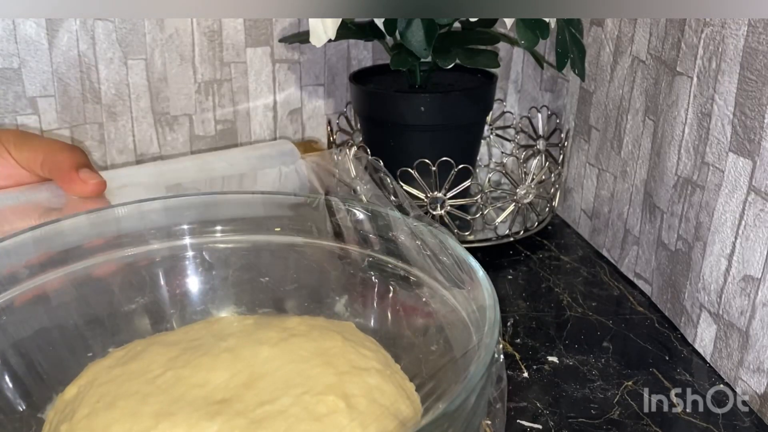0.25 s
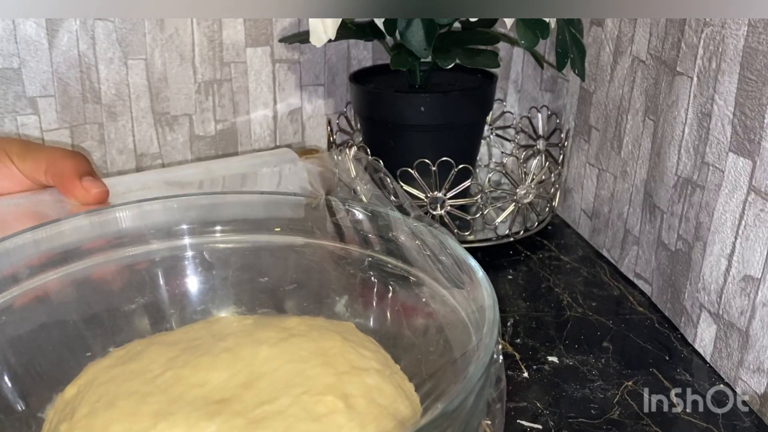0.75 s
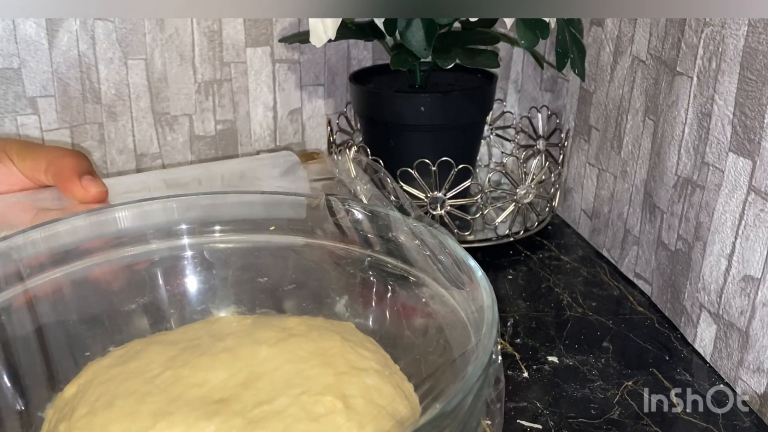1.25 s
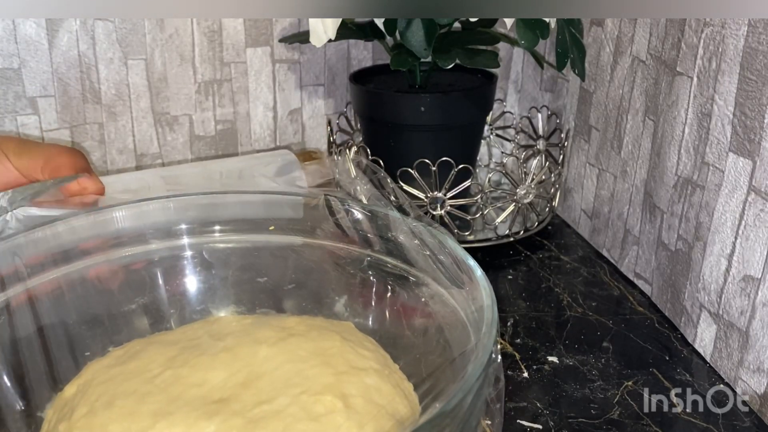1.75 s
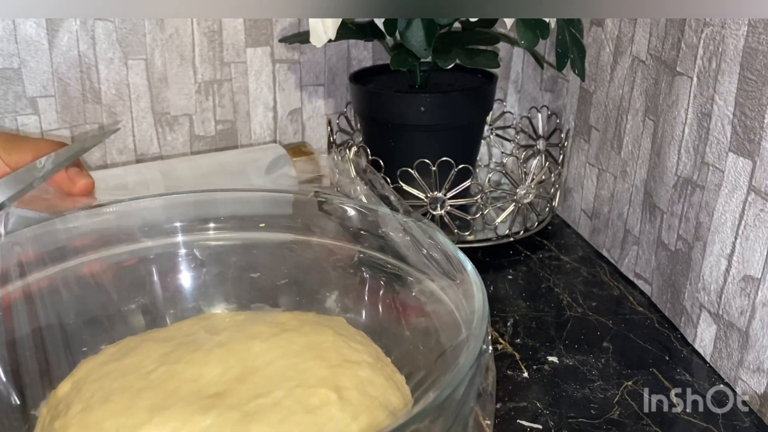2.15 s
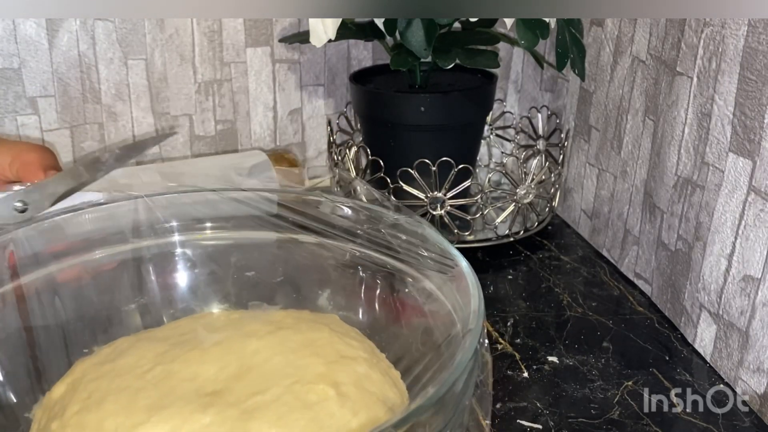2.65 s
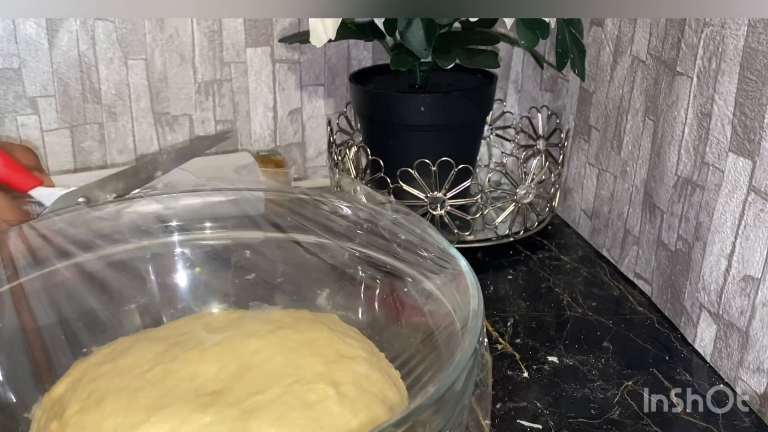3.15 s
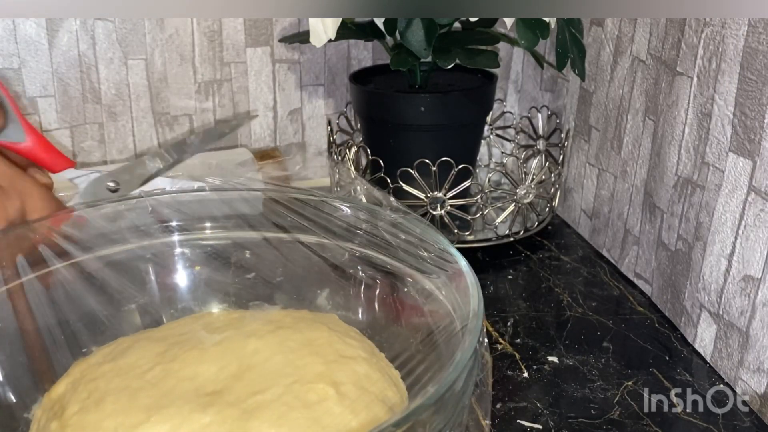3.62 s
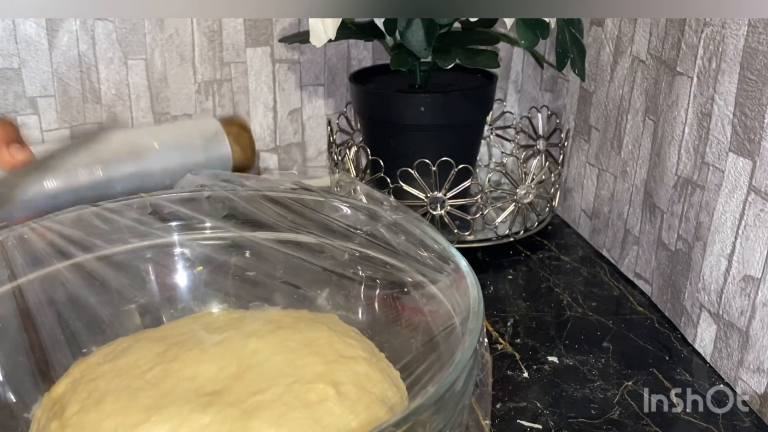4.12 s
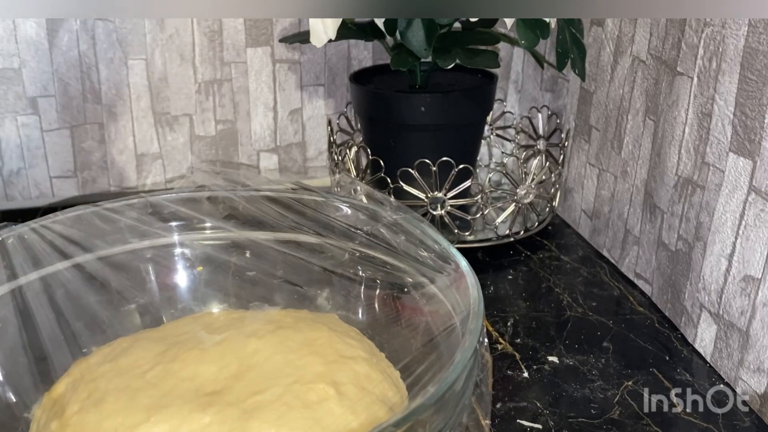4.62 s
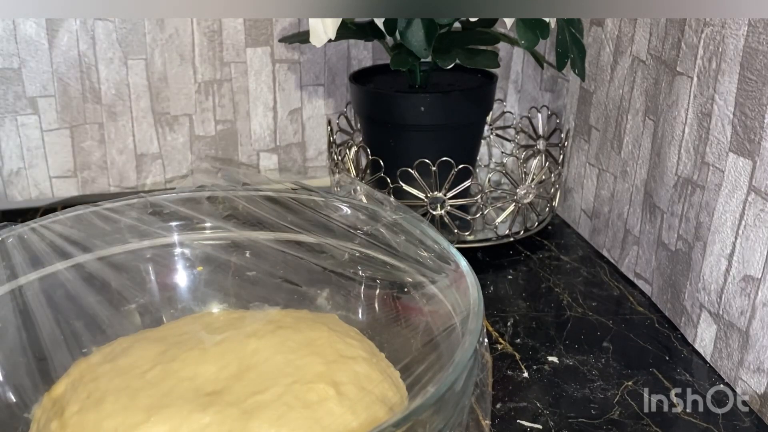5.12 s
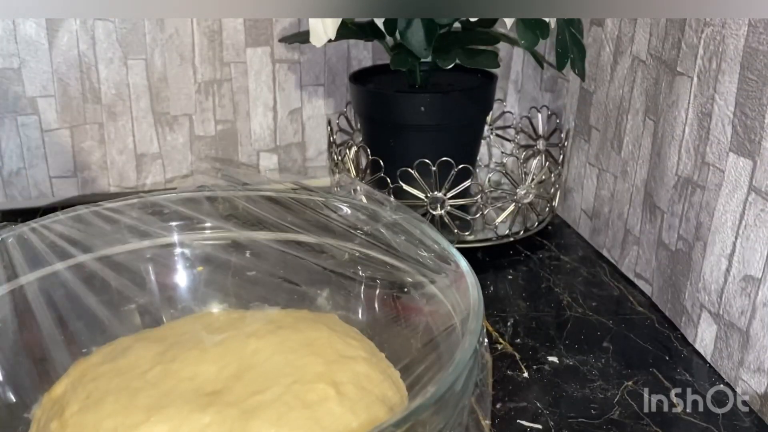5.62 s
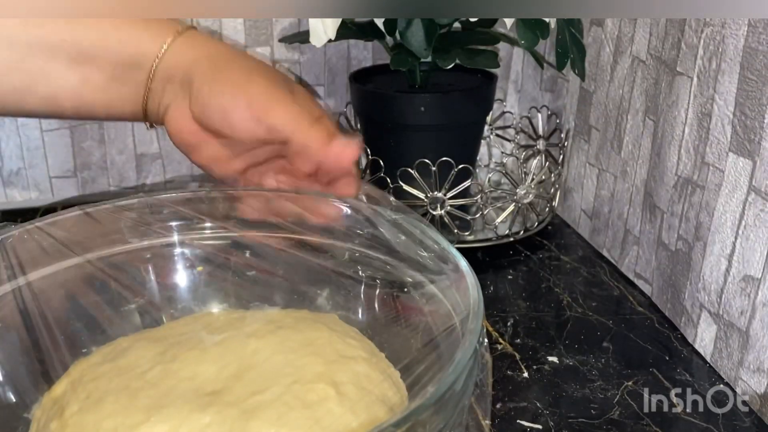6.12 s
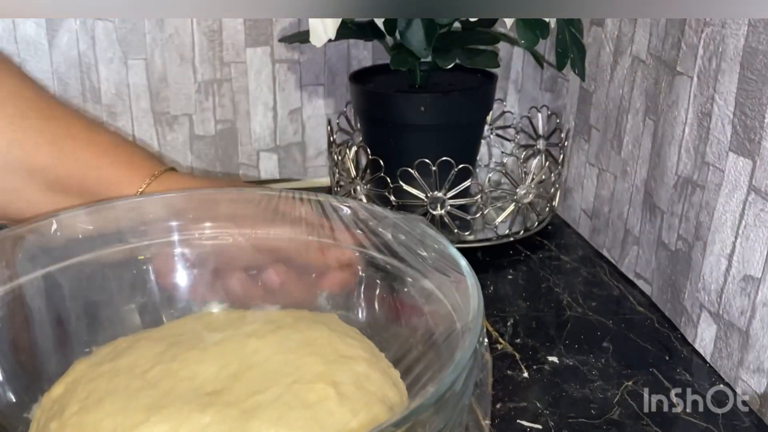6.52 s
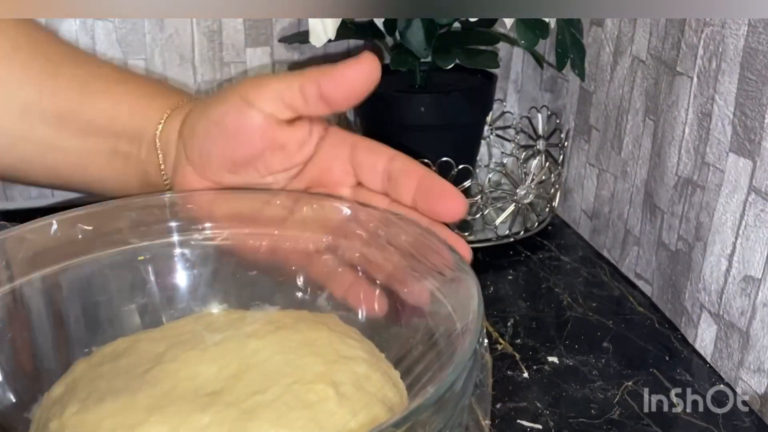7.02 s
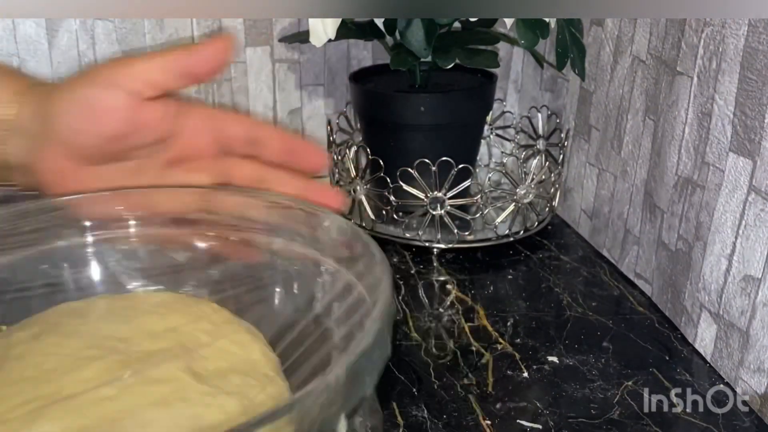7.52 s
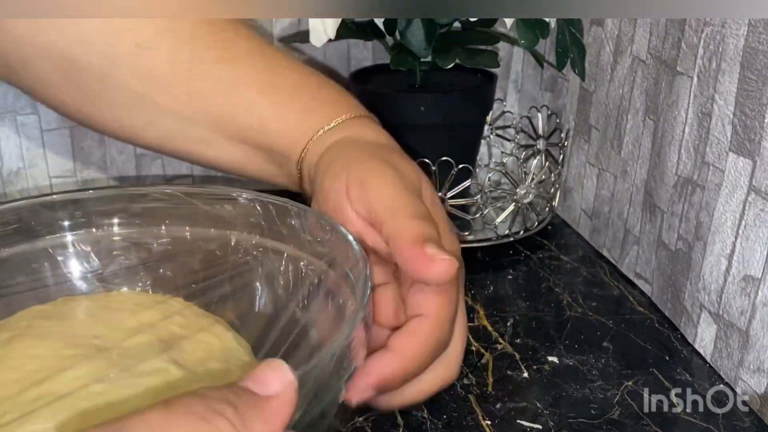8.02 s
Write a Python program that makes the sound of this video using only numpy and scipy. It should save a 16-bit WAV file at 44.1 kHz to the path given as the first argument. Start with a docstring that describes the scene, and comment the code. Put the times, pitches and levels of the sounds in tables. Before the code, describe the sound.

Sharp plastic-film cracks and flaps, a few dull knocks of things set down, brief rustling pats, then near quiet with a faint appliance hum.

```python
"""In a small kitchen, cling film is pulled over a glass bowl and pressed down by hand while an appliance hums.
Film that sticks and slips gives noise bursts: cracks, flaps and drumming; its small creases rustle and pop.
Decaying modes make the glass ring faintly and sound the knocks of roll and scissors, a clink and a nudged bowl.
Low swelling sines are the thuds of hand and roll; shaped noise is the room, which also echoes the rest."""
import sys
import numpy as np
from scipy import signal
from scipy.fft import rfft, irfft, next_fast_len
from scipy.io import wavfile

SR = 44100
rng = np.random.default_rng(int(sys.argv[2]) if len(sys.argv) > 2 else 0)


def store_wav(level_fs):
    """Save 16-bit WAV to argv[1]."""
    pcm = np.round(np.clip(np.atleast_2d(level_fs), -1, 1) * 32767)
    wavfile.write(sys.argv[1], SR, pcm.T.astype(np.int16))


N = 364697  # samples


def amp(db):
    """Logarithmic level: decibels become a pressure gain."""
    return 10 ** (np.asarray(db) / 20)


def read(points, hz):
    """Interpolation by straight lines on a logarithmic frequency axis."""
    f, value = np.transpose(points)
    return np.interp(np.log(hz + 1), np.log(f + 1), value)


def evened(x):
    """Normalisation to unit root mean square."""
    return x / np.sqrt(np.mean(x ** 2) + 1e-20)


def add(mix, s, sound):
    """Superposition: adds a sound to the mix from time s, in seconds."""
    part = mix[..., max(round(s * SR), 0):][..., :sound.shape[-1]]
    part += sound[..., :part.shape[-1]]


def colour(x, spectrum, size=2048, skirt_db=36):
    """Minimum-phase filtering: the log gain fixes the phase; skirt_db per octave is lost above the last point."""
    hz = abs(np.fft.fftfreq(size, 1 / SR))
    octaves_above = np.log2(np.maximum(hz / spectrum[-1][0], 1))
    db = read(spectrum, hz) - skirt_db * octaves_above
    log_gain = np.log(amp(np.maximum(db, -110)))
    taps = np.fft.ifft(np.exp(np.conj(signal.hilbert(log_gain)))).real
    taps /= np.linalg.norm(taps)
    return signal.oaconvolve(x, taps[None], axes=1)[:, :x.shape[1]]


# Level of the hum as picked up, which is heard to thin late on. Each row: time in seconds, level in dB.
HUM_LEVEL = [(0, -49.5), (6.72, -50), (6.82, -74), (7.45, -78), (7.72, -63.5), (7.95, -58.5), (8.04, -68),
             (8.27, -58)]
# Partials of the hum. Each row: multiple of the fundamental, relative level in dB.
HUM_PARTIALS = [(1, 1.5), (2, -15), (3, -34.5)]
# Spectrum of the whirr round the hum. Each row: frequency in Hz, relative density in dB per Hz.
WHIRR_SPECTRUM = [(20, -21.5), (45, -6), (75, -1), (130, -4.5), (200, -6.5), (290, -7.5), (420, -15),
                  (520, -4.5), (680, -22.5), (1000, -26), (1350, -19), (1700, -48)]
HUM_HZ = 48.2


def hum(hum_db=0, rumble_db=-11, waver=0.03):
    """Harmonic series: partials of a slightly wavering fundamental, with filtered noise under the same level."""
    t = np.arange(N) / SR
    level = amp(np.interp(t, *np.transpose(HUM_LEVEL)))
    drift = np.interp(t, np.linspace(0, t[-1], 40), rng.standard_normal(40))
    turns = HUM_HZ * t + waver * drift  # phase in cycles
    partials = [amp(db) * np.sin(2 * np.pi * (k * turns + rng.random())) for k, db in HUM_PARTIALS]
    tone = evened(sum(partials))
    whirr = colour(rng.standard_normal((2, N)), WHIRR_SPECTRUM)
    return level * (amp(hum_db) * tone + amp(rumble_db) * whirr)


# Spectrum of the wash of the room. Each row: frequency in Hz, relative density in dB per Hz.
AIR_SPECTRUM = [(50, -35.5), (110, -24), (170, -1), (260, 1.5), (500, 2.5), (700, -10), (1000, -12),
                (1300, -6), (1700, -22), (4500, -28), (6300, -24.5), (7500, -31.5), (8300, -36),
                (11500, -41.5)]
AIR_DB = -67


def air():
    """Stationary noise: the steady wash of the room is filtered white noise."""
    return amp(AIR_DB) * colour(rng.standard_normal((2, N)), AIR_SPECTRUM)


LEAD = .015  # s, how long a contact creeps before it lets go
PORT_LAG = .0003  # s, how much earlier sharp cracks reach the left port


def burst(length, spectrum, creep_db, lag=0, creep_time=.0045, grain_db=4, vary_db=2.88, alike=0.61,
          size=3600):
    """Stick-slip release: tiny slips build up for LEAD, let go and decay, with the energy of 10 ms at rms 1."""
    t = np.arange(size) / SR - LEAD
    creep = amp(creep_db) * np.exp(-abs(t) / creep_time)
    decay = np.exp(-abs(t) / max(length, 1e-4))
    envelope = np.where(t < 0, creep, decay)
    grain = amp(grain_db * rng.standard_normal(size))
    slips, other = rng.standard_normal((2, size)) * grain * envelope
    # the ports hear partly the same slips
    left = alike * np.roll(slips, round(lag * SR)) + np.sqrt(1 - alike ** 2) * other
    # no two creases or contacts have quite the same colour
    varied = [(hz, db + vary_db * rng.normal()) for hz, db in spectrum]
    sound = colour(np.array([left, slips]), varied)
    return sound / np.linalg.norm(sound, axis=1, keepdims=True) * np.sqrt(SR / 100)


THUD_PEAK_S = 0.0098


def thud(db, hz):
    """Soft heavy contact: a low sine swells to THUD_PEAK_S and dies under a smooth force pulse."""
    t = np.arange(SR // 5) / SR
    u = t / THUD_PEAK_S
    return amp(db) * (u * np.exp(1 - u)) ** 2 * np.sin(2 * np.pi * hz * t)


# Clearest snaps of the film. Each row: time in seconds, strength in dB,
# sharpness (treble against middle, before the layer levels) in dB.
FILM_SNAPS = [(0.449, -44.5, -27.5), (0.783, -30.5, -13.5), (0.812, -34.5, -26), (0.837, -31, -16.5),
              (0.970, -33, -23.5), (1.089, -20, -17), (1.137, -18.5, -13.5), (1.145, -30, -11),
              (1.521, -34, -27), (1.59, -26, -20), (1.696, -33, -17.5), (1.800, -35, -17),
              (1.931, -36, -24), (1.990, -36.5, -11), (1.997, -31, -17), (2.091, -33, -26),
              (2.186, -28.5, -18.5), (2.273, -24.5, -11.5), (2.340, -26.5, -18), (2.382, -27, -19.5),
              (2.411, -29, -20.5), (2.474, -24, -17), (2.612, -38, -11), (2.823, -40, -36),
              (2.944, -33, -17.5), (2.957, -28, -17), (3.012, -39.5, -8), (3.058, -27, -12),
              (3.142, -39, -16), (3.239, -40, -21), (3.300, -25.5, -14), (3.685, -46, -16.5),
              (3.746, -36, -18.5), (3.780, -31.5, -17), (3.887, -42, -5), (3.985, -45.5, -12.5),
              (6.215, -31, -21), (6.233, -23, -25), (6.293, -24.5, -18), (6.399, -31.5, -14),
              (6.552, -33, -19), (6.993, -45.5, -4.5), (8.092, -53, 1)]
# Spectra of the film's crack, of the flapping loose sheet and of the drumming stretched part (before tension).
# Each row: frequency in Hz, relative density in dB per Hz.
CRACK_SPECTRUM = [(1300, -4), (1900, 1.5), (2500, 2), (3500, 3.5), (5000, -0.5), (6500, 4), (7400, -6.5),
                  (8400, -1.5), (10000, -12), (11400, -16.5), (12300, -35), (15000, -41)]
FLAP_SPECTRUM = [(400, -21), (550, -6), (750, 0), (950, -5), (1200, -0.5), (1450, -4.5), (1750, -21.5),
                 (2100, -31.5)]
DRUM_SPECTRUM = [(50, -18), (88, -4), (150, -6), (205, -0.5), (270, 1.5), (370, -8), (500, -15), (700, -30)]
# Film drawn tighter over the rim drums higher. Each row: time in seconds, pitch as a factor.
FILM_TENSION = [(1.8, 1.02), (2.9, 1.41), (6.2, 1.3)]
# a sharper snap is a shorter slip: length at sharpness 0 (s), dB of length lost per dB of sharpness
SLIP_S, SLIP_SHORTENING = 0.0019, 0.42
SHEET_HZ, SHEET_SPREAD = 1097, 0.15  # swing of the loose sheet, and its random spread as a share
# each snap tugs the bowl a moment later: dB against the snap at tension 1, Hz, s
TUG_DB, TUG_HZ, TUG_DELAY_S = -21, 94, 0.0072
TUG_LOSS_DB = 25  # tight film gives less: dB lost per unit of tension


def snaps(crack_db=-5.0, flap_db=-12, note_db=-10, soft_under_db=-22, note_time=0.0015, drum_db=-12,
          flap_stretch=2.12, drum_length=0.008, drum_lag=0.0028, creep_db=-14):
    """Sudden release of strain: film leaves glass with a crack, the loose sheet flaps, the taut part drums and tugs."""
    out = np.zeros((2, N))
    t = np.arange(SR // 20) / SR
    swell = t / note_time * np.exp(1 - t / note_time)
    for s, db, sharpness in FILM_SNAPS:
        length = SLIP_S * amp(-SLIP_SHORTENING * sharpness)
        hz = SHEET_HZ * (1 + SHEET_SPREAD * rng.normal())
        tension = np.interp(s, *np.transpose(FILM_TENSION))
        taut = [(f * tension, level) for f, level in DRUM_SPECTRUM]
        swing = swell * np.sin(2 * np.pi * hz * t)
        weakness = max(soft_under_db - db, 0)  # soft snaps swing the sheet less
        crack = burst(length, CRACK_SPECTRUM, creep_db, lag=-PORT_LAG)
        flap = burst(length * flap_stretch, FLAP_SPECTRUM, creep_db)
        drum = burst(drum_length, taut, creep_db, alike=0.33)
        add(out, s, amp(db + note_db - weakness) * 2 * swing)
        add(out, s - LEAD, amp(db + sharpness + crack_db) * crack)
        add(out, s - LEAD, amp(db + flap_db) * flap)
        add(out, s - LEAD + drum_lag, amp(db + drum_db) * drum)
        add(out, s + TUG_DELAY_S, thud(db + TUG_DB - TUG_LOSS_DB * (tension - 1), TUG_HZ))
    return out


# Pulls and strokes of the hand over the film. Each row: start in seconds, length in seconds, relative level in dB,
# sharpness (treble against middle, before the layer levels) in dB.
HAND_STROKES = [(0.532, 0.14, -63, -13), (0.764, 0.077, -38, -19.5), (0.933, 0.081, -47.5, -18.5),
                (1.583, 0.077, -43, -14.5), (1.772, 0.047, -48, -17), (1.921, 0.11, -47.5, -15),
                (2.141, 0.069, -43.5, -15), (2.255, 0.18, -42, -11.5), (2.598, 0.1, -50, -10),
                (2.869, 0.12, -47.5, -12), (3.074, 0.033, -45, -13), (3.123, 0.12, -57, -11),
                (3.795, 0.086, -40.5, -10.5), (4.852, 0.17, -67, -5), (6.087, 0.115, -52, -10.5),
                (6.208, 0.11, -38.5, -19), (6.354, 0.12, -50, -18), (6.549, 0.09, -48, -12),
                (6.965, 0.054, -60.5, 1), (7.112, 0.21, -63.5, -1.5), (7.9, 0.13, -66.5, 4.5),
                (8.03, 0.13, -61, 8), (8.171, 0.1, -66, 6.5)]
STROKE_SWELL, STROKE_RELEASE_S = 0.19, 0.02  # swell as a share of the length; decay time after it


def rustle(per_s=900, spread_db=3.5, crackle_db=-7, flap_db=-7, drum_db=-9, port_lag=0.00037):
    """Random impulse train: many small creases buckle while the film is pulled or smoothed."""
    t = np.arange(SR) / SR
    creases = (rng.random(N) < per_s / SR) * rng.choice([-1, 1], N)
    creases = evened(creases * amp(spread_db * np.minimum(rng.exponential(1, N), 4)))
    crackle, flap = np.zeros((2, N))
    for start, length, db, sharpness in HAND_STROKES:
        swell = np.minimum(t / (STROKE_SWELL * length), 1)
        effort = swell * np.exp(-np.maximum(t - length, 0) / STROKE_RELEASE_S)
        add(crackle, start, amp(db + sharpness) * effort)
        add(flap, start, amp(db) * effort)
    # creases lie all over the sheet, so each reaches the left port at its own moment, mostly a little earlier
    at = np.flatnonzero(creases)
    advance = SR * port_lag * rng.uniform(-1, 3, N)[at]
    left = np.zeros(N)
    left[np.clip(at - advance.astype(int), 0, N - 1)] = creases[at]
    pair = np.array([left, creases])
    sheet = amp(flap_db) * colour(pair * flap, FLAP_SPECTRUM)
    sheet += amp(drum_db) * colour(pair * flap, DRUM_SPECTRUM)
    return amp(crackle_db) * colour(pair * crackle, CRACK_SPECTRUM) + sheet


POPS_PER_S, POP_DB = 22, 3  # rate within a stroke; dB against the stroke, before random size


def pops(flap_db=-3, crack_db=-3, length=.002, creep_db=-20):
    """Snap buckling: single small creases give way at random moments of each stroke."""
    out = np.zeros((2, N))
    for start, span, db, sharpness in HAND_STROKES:
        for when, size in rng.random((round(POPS_PER_S * span), 2)):
            crack = burst(length, CRACK_SPECTRUM, creep_db, lag=-PORT_LAG)
            flap = burst(length, FLAP_SPECTRUM, creep_db)
            pop = amp(sharpness + crack_db) * crack + amp(flap_db) * flap
            add(out, start + when * span - LEAD, amp(db + POP_DB) * size * pop)
    return out


def ring(modes, detune=0, port_spread=0.6, onset=.0004):
    """Modal synthesis: decaying sines, each in a slightly different phase at the two ports."""
    t = np.arange(SR * 3 // 4) / SR
    rise = 1 - np.exp(-(t / onset) ** 2)
    out = np.zeros((2, len(t)))
    for hz, db, t60 in modes:
        turns = hz * (1 + detune * rng.normal()) * t + port_spread * rng.random((2, 1))
        out += rise * amp(db - 60 * t / t60) * np.sin(2 * np.pi * turns)
    return out


# The film plucks the rim of the bowl. Each row: time in seconds, level in dB before the modes' own levels.
RIM_PLUCKS = [(0.84, -82.5), (1.14, -80), (1.592, -79), (2.28, -73), (2.959, -71), (3.85, -77)]
# Modes of the glass bowl. Each row: frequency in Hz, relative level in dB, t60 in seconds.
GLASS_MODES = [(2280, 14, 0.53), (4530, -13, 0.59), (6417, -21, .3)]


def bowl():
    """Free vibration: plucked by the film, the glass now and then sings faintly in its modes."""
    out = np.zeros((2, N))
    for s, db in RIM_PLUCKS:
        add(out, s, amp(db) * ring(GLASS_MODES))
    return out


# Roll and scissors are put down, a ring or bracelet on the hand clinks (6.235 s), then the bowl is nudged
# on the worktop. Each row: time in seconds, relative levels of hollow body, clack, tick and steel ring in dB,
# share of the contact sent to the room in dB, pitch of the body as a factor.
CONTACTS = [(4.505, -33, -45, -56.5, -68, 2.5, 1.33), (4.576, -13.5, -34, -44, -34, 5.5, 1.55),
            (4.592, -13.5, -38.5, -48, -48, 10, 1.61), (4.652, -18, -32.5, -42.5, -69, -0.5, 1.12),
            (5.277, -9.5, -42, -60, -67.5, 10.5, 0.73), (5.311, -23.5, -39, -45.5, -64.5, -4, 0.97),
            (5.322, -20, -33.5, -48.5, -61, 3, 0.86), (5.331, -17, -34, -42.5, -61, 2, 1.18),
            (5.391, -3, -16.5, -43.5, -33.5, -6.5, 1.024), (6.235, -35, -57, -48, -41, 3, 1.44),
            (7.205, -47, -73.5, -80, -85, 0, 1.6), (7.8, -56, -80, -90, -95, -2, 1.1)]
# Modes of the hollow body before its pitch factor, then of the short steel ring.
# Each row: frequency in Hz, relative level in dB, t60 in seconds.
BODY_MODES = [(187.8, 1, .18), (226, 2.5, 0.2), (244, -3.5, 0.12), (345, -8.5, 0.029), (400, -9.5, 0.023),
              (474, -8, 0.039), (537, -14, 0.08), (680, -15.5, 0.022)]
STEEL_MODES = [(1842, -3, .06), (2780, -3, .035), (3023, 3, .05), (3140, -3, .035)]
# Spectra of the body's rattle (before its pitch shift), of the clack and of the tick.
# Each row: frequency in Hz, relative density in dB per Hz.
RATTLE_SPECTRUM = [(130, -22), (210, 6), (280, -3), (390, -10), (560, -13), (720, -14), (900, -23.5)]
CLACK_SPECTRUM = [(220, -15), (400, -8), (490, 2.5), (600, -4), (690, 2.5), (790, -5.5), (900, 5),
                  (1020, -5.5), (1140, 2.5), (1300, -4), (1410, -9.5), (1540, -5.5), (1700, -16),
                  (2000, -20), (2400, -32.5)]
TICK_SPECTRUM = [(1400, -12.5), (1850, 7), (2500, 0.5), (3000, 4), (3800, -4.5), (5000, -6), (6300, -3),
                 (7400, -13.5), (8400, -11), (11000, -31), (12500, -42.5)]


def knocks(body_db=-14, rattle_db=-9, clack_db=0, tick_db=-3, steel_db=-3, rise=0.0016,
           rattle_length=0.017, clack_length=0.0063, tick_length=0.0031, scrape_db=-11,
           body_room_db=-2.0, steel_room_db=-13, rattle_follows=0.58):
    """Impact excitation: scraping contact noise and ringing modes. Returns direct sound and room feed."""
    direct, feed = np.zeros((2, 2, N))
    for s, body, clack, tick, steel, room_db, pitch in CONTACTS:
        modes = [(hz * pitch, db, t60) for hz, db, t60 in BODY_MODES]
        hollow = amp(body + body_db) * ring(modes, detune=0.023)
        hollow *= 1 - np.exp(-(np.arange(hollow.shape[1]) / SR / rise) ** 2)
        shifted = [(hz * pitch ** rattle_follows, db) for hz, db in RATTLE_SPECTRUM]
        rattle = amp(body + rattle_db) * burst(rattle_length, shifted, scrape_db, alike=.25)
        contact = amp(clack + clack_db) * burst(clack_length, CLACK_SPECTRUM, scrape_db)
        contact += amp(tick + tick_db) * burst(tick_length, TICK_SPECTRUM, scrape_db, lag=-PORT_LAG)
        steel_ring = amp(steel + steel_db) * ring(STEEL_MODES)
        parts = [(s, hollow, body_room_db), (s - LEAD, rattle, body_room_db),
                 (s - LEAD, contact, room_db), (s, steel_ring, steel_room_db)]
        for start, sound, send_db in parts:
            add(direct, start, sound)
            add(feed, start, amp(send_db) * sound)
    return direct, feed


# Heaviest dull pushes on worktop and bowl. Each row: time in seconds, relative level in dB, pitch in Hz.
PUSHES = [(4.515, -33, 131), (4.602, -17.5, 130.6), (4.883, -42.5, 104.8), (5.282, -16, 107.8),
          (5.323, -25, 122), (5.398, -16, 128), (5.424, -25, 69.2), (6.238, -35, 63.6), (6.304, -28.5, 155),
          (6.322, -26, 79.1), (6.342, -26, 72.22), (6.402, -34.5, 151.3), (7.028, -37, 132.3)]
# the palm then stutters down the side of the bowl in ever weaker slips
PALM_START_S, PALM_STEP_S, PALM_DB, PALM_FADE_DB_PER_S, PALM_HZ = 6.455, .045, -37, -51, 118


def thuds(level_db=1, pitch_spread=.22, step_spread=0.11, count=6):
    """Low-frequency impact: roll and hand bump worktop and bowl; then the palm sticks and slips on the glass."""
    out = np.zeros((2, N))
    for s, db, hz in PUSHES:
        add(out, s, thud(db + level_db, hz))
    for k, (late, tension) in enumerate(rng.standard_normal((count, 2))):
        after = PALM_STEP_S * (k + step_spread * late)
        slip = thud(PALM_DB + PALM_FADE_DB_PER_S * after, PALM_HZ * np.exp(pitch_spread * tension))
        add(out, PALM_START_S + after, slip)
    return out


# Decay of the kitchen. Each row: frequency in Hz, t60 in seconds.
ROOM_DECAY = [(100, 0.5), (250, 0.59), (600, 0.32), (1300, 0.4), (3500, 0.36), (7000, 0.44), (11000, 0.22)]
# Reverberation against the sound fed to the room. Each row: frequency in Hz, level in dB.
ROOM_LEVEL = [(100, 2.5), (300, -2), (1200, -4), (3000, -2), (6500, 1), (11000, -5.5)]


def kitchen(x, first=.004, early_db=-5, early_span=.014):
    """Reverberation: close walls and worktop reflect early, then a dense diffuse tail decays band by band."""
    t = np.arange(SR * 3 // 4) / SR
    taps = rng.standard_normal((2, len(t))) * (t > first)
    hz, when, z = signal.stft(taps, SR, nperseg=256)
    t60 = read(ROOM_DECAY, hz)[:, None]
    unit_energy = np.sqrt(2 * np.log(1000) / (t60 * SR))
    z *= amp(read(ROOM_LEVEL, hz)[:, None] - 60 * when / t60) * unit_energy
    response = signal.istft(z, SR, nperseg=256)[1]
    for port in response:
        at = (SR * (first + early_span * rng.random(8))).astype(int)
        port[at] += amp(early_db) * rng.choice([-1, 1], len(at)) / np.sqrt(len(at))
    return signal.oaconvolve(x, response, axes=1)[:, :N]


def scene(film_room_db=0, knock_room_db=-2, thud_room_db=-7):
    """Superposition: film, bowl, knocks and thuds with their reverberation, over hum and air."""
    steady = hum() + air()
    film = snaps() + rustle() + pops()
    glass = bowl()
    knock, knock_feed = knocks()
    push = thuds()
    feed = amp(film_room_db) * film + amp(knock_room_db) * knock_feed + amp(thud_room_db) * push
    return film + glass + knock + push + kitchen(feed) + steady


# Balance of the two microphone ports. Each row: frequency in Hz, left minus right in dB.
PORT_BALANCE = [(300, -.5), (620, -0.5), (1120, -5), (2000, -3), (3600, -2), (6400, 1.5), (8500, -14),
                (11600, -8.5)]
# Difference between the ports. Each row: frequency in Hz, share that is kept.
PORT_DIFFERENCE = [(60, .55), (130, 0.64), (270, 0.83), (500, 1), (12000, 0.88)]
# Level of the bass, which drops away twice near the end. Each row: time in seconds, gain in dB.
BASS_GAIN = [(6.73, 5), (6.79, -29), (6.99, -10.5), (7.024, -1), (7.049, -1), (7.084, -29), (7.48, -30),
             (7.62, 0), (7.98, 6), (8.06, -6), (8.27, -10)]
BASS_HZ, LOW_CUT_HZ, EDGE_HZ = 163.6, 42, 15000  # top of that bass; lower and upper band limits


def record(dry):
    """Two-port pickup: the ports share bass, the left is mostly weaker in treble; the band is limited."""
    size = next_fast_len(N + 4096)
    hz = np.fft.rfftfreq(size, 1 / SR)
    left, right = rfft(dry, size)
    mid = (left + right) / 2
    side = (left - right) / 2 * np.clip(read(PORT_DIFFERENCE, hz), 0, 1)
    lean = amp(read(PORT_BALANCE, hz) / 2)
    low_cut = hz ** 6 / (hz ** 6 + LOW_CUT_HZ ** 6)
    pair = np.array([(mid + side) * lean, (mid - side) / lean]) * low_cut
    bass = irfft(pair / (1 + (hz / BASS_HZ) ** 10), size)[:, :N]
    bass_gain = amp(np.interp(np.arange(N) / SR, *np.transpose(BASS_GAIN)))
    ports = irfft(pair, size)[:, :N] + bass * (bass_gain - 1)
    top_cut = signal.firwin(255, EDGE_HZ, window=("kaiser", 9), fs=SR)
    return signal.oaconvolve(ports, top_cut[None], "same")


dry = scene()
out = record(dry)
store_wav(out)
```